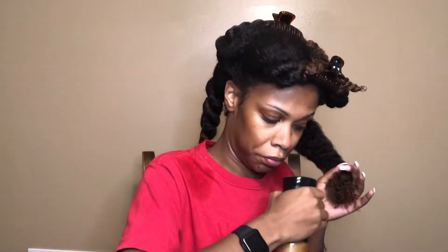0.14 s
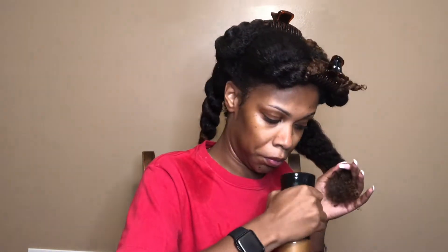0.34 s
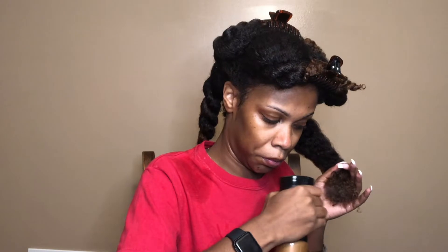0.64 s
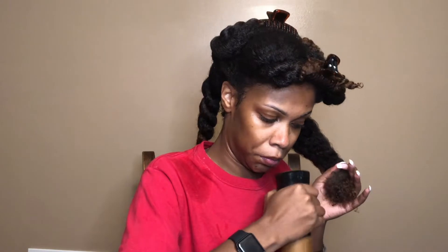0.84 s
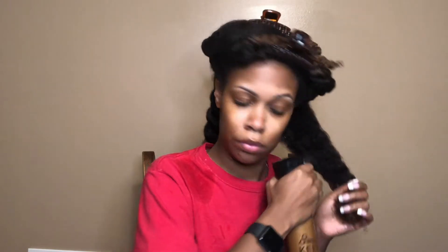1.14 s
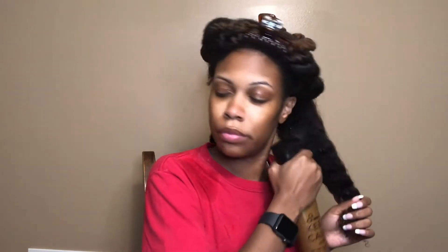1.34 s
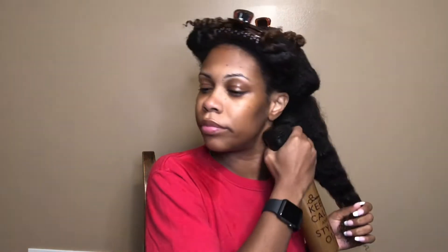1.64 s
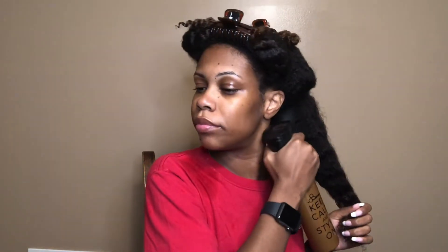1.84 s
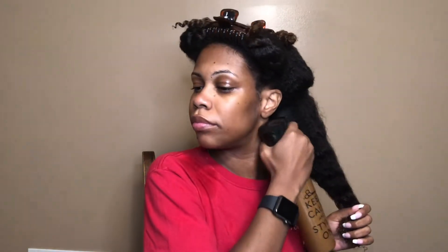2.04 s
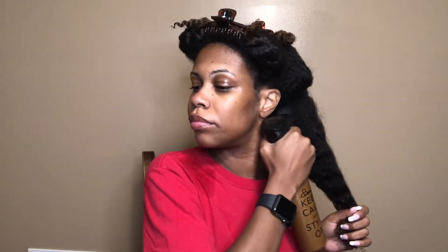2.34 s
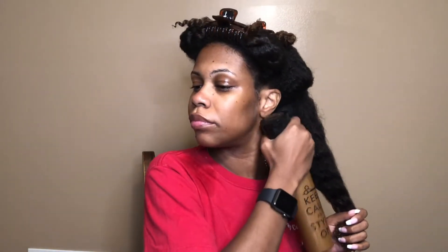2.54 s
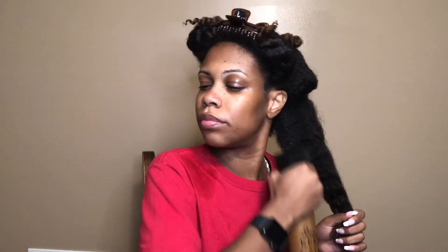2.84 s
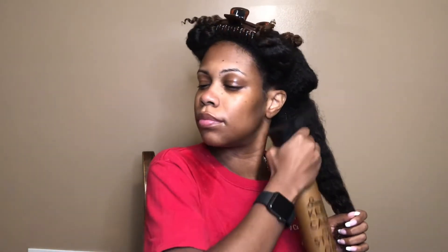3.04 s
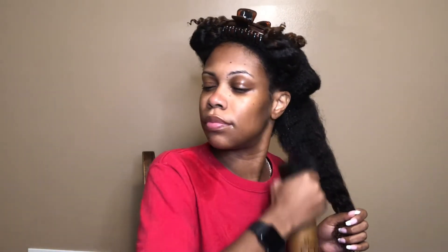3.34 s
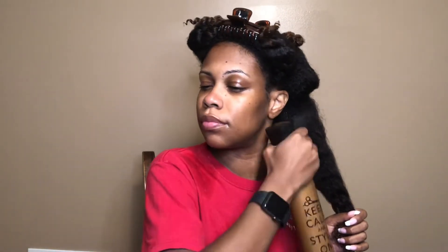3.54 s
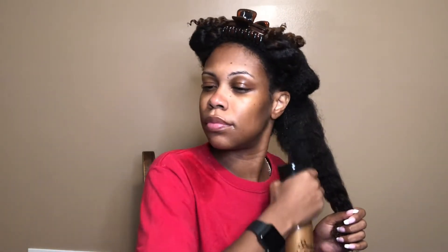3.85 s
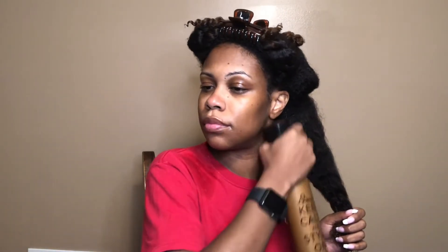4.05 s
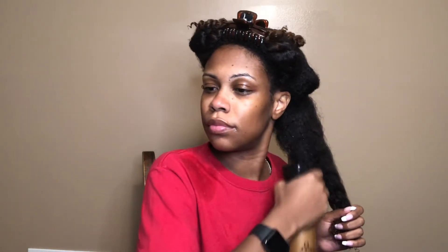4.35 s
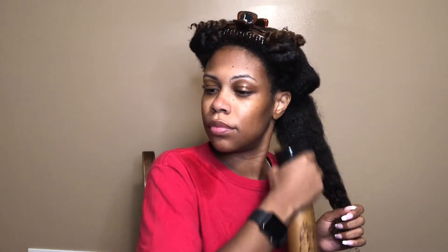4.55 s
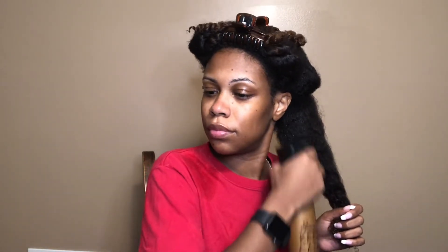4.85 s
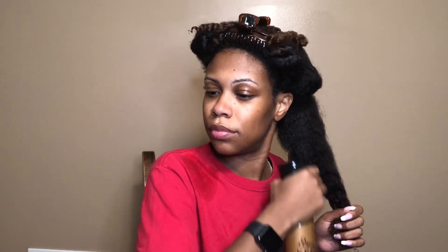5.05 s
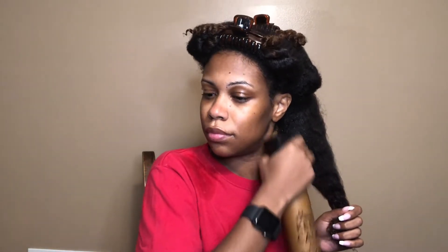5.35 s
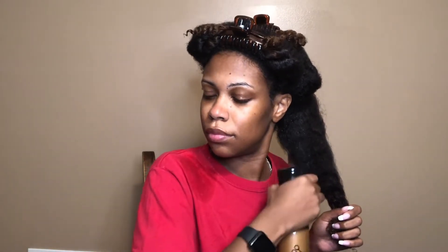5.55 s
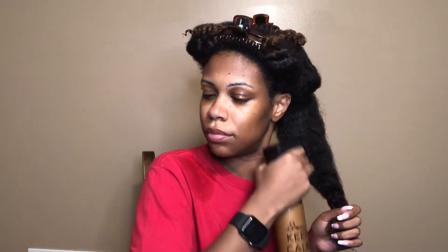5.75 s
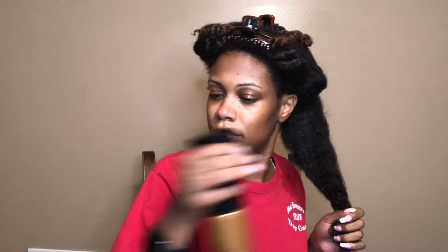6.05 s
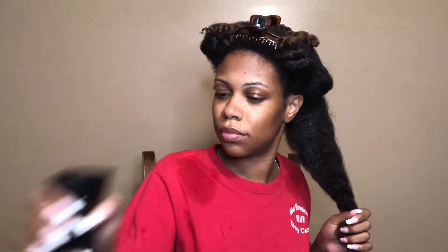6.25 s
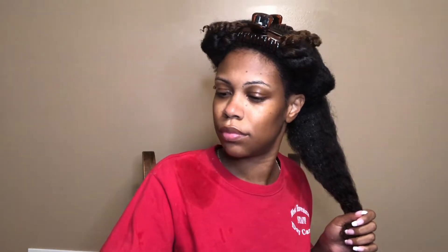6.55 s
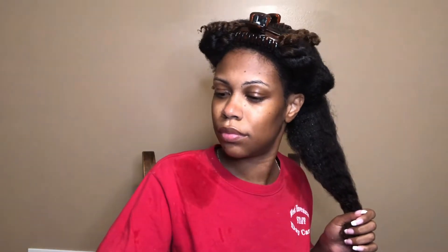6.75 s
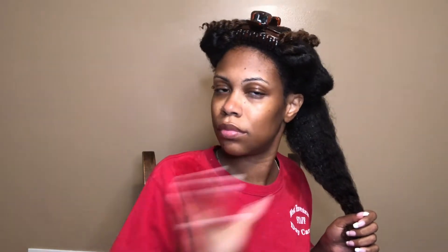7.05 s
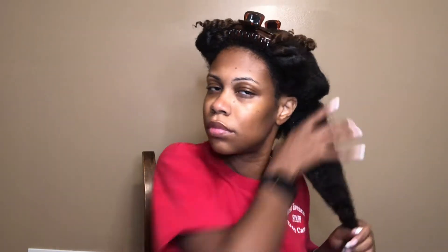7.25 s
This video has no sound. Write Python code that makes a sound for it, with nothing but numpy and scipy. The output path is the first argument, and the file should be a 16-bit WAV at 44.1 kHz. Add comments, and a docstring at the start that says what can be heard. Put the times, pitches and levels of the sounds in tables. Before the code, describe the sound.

A single microphone in a small, quiet indoor room, with soft air noise and, from about 1.3 seconds, a faint wavering low hum. From the start a bottle sprays fine water mist onto hair: a steady, bright, airy hiss, slightly fluttering and swishing as the hand moves. Small hollow water plops and faint gurgles sit beneath it, the clearest near 1.9 seconds, with a few soft dull hand bumps. Around 4.1 to 4.4 a faint breathy whistle glides upward; the hiss then pulses gently and weakens, cutting off quickly at about 5.6. Near-silence follows, with a tiny plastic tick at 6.2 and another at 6.5. At 6.56 the bottle lands on a wooden table with one sharp, loud, hollow knock and short woody ring. From 6.95 it wobbles, its rim giving a quick irregular run of softer, dull low taps and rolling rumble until the end, about 7.4.

```python
"""A continuous-mist bottle sprays water onto hair in one long hiss: shaped noise, combed by reflections and moved about.
A brief whistle of narrow noise rides on it; water plops and dull bumps are ringing sines, cap ticks ring plastic modes.
The mist dies away, the bottle knocks onto a wooden table and wobbles there, its taps and rolling exciting table modes.
Behind it lies a small quiet room: coloured noise for the air and a low, wavering hum. One microphone hears it all."""
import sys
import numpy as np
from scipy import signal
from scipy.fft import rfft, irfft, next_fast_len
from scipy.io import wavfile
from scipy.ndimage import map_coordinates

SR = 44100
rng = np.random.default_rng(int(sys.argv[2]) if len(sys.argv) > 2 else 0)


def unload_wav(signal):
    """Save mono or channel-first audio to the path in sys.argv[1] as 16-bit WAV at rate SR, clipped to [-1, 1]."""
    wavfile.write(
        sys.argv[1],
        SR,
        np.round(np.clip(np.atleast_2d(signal).T, -1, 1) * 32767).astype(np.int16),
    )


N = 325899

# The mist swells and fades as the nozzle turns, levels before trim:
# t/s, hiss level/dB, bright edge level/dB, fine spray level/dB
MIST_LEVELS = [(0.03, -48, -52.5, -54.5), (0.09, -49, -51, -54), (0.18, -49.5, -51.5, -55),
               (0.32, -47, -49, -51.5), (0.43, -48, -50.5, -53), (0.62, -48, -51, -52.5),
               (0.73, -49.5, -52, -54), (0.82, -46.5, -46.5, -51), (0.85, -47.5, -49, -51),
               (1.27, -50.5, -53.5, -56), (1.35, -48.5, -48.5, -51.5), (1.42, -48.5, -49.5, -54.5),
               (1.74, -46.5, -53, -53.5), (1.84, -45.5, -49, -51), (1.87, -47.5, -49.5, -52),
               (2.06, -47.5, -53, -54.5), (2.2, -47.5, -55, -55), (2.31, -47.5, -50, -51.5),
               (2.63, -48, -52.5, -52.5), (2.68, -48.5, -54, -57), (2.73, -51.5, -54, -55),
               (2.77, -50.5, -50, -53.5), (2.87, -48.5, -48.5, -52), (2.93, -50.5, -50.5, -53),
               (2.98, -48, -52.5, -51.5), (3.29, -51.5, -51.5, -55), (3.37, -48.5, -47.5, -52.5),
               (3.5, -48.5, -50.5, -53.5), (3.53, -48, -52, -50.5), (3.86, -51.5, -51.5, -55),
               (4.09, -50, -54, -54), (4.51, -52.5, -53.5, -56.5), (4.81, -51, -56, -55.5),
               (5.06, -55, -54.5, -57.5), (5.33, -51.5, -56.5, -56.5), (5.6, -55, -56, -57.5)]
# Low rush on the hair, before trim: t/s, level/dB
RUSH_LEVELS = [(0.03, -54.5), (0.06, -57), (0.68, -56.5), (0.85, -55.5), (1.27, -56.5), (1.3, -55.5),
               (1.91, -53), (2.18, -55), (2.62, -54), (2.9, -57.5), (3.01, -55.5), (3.19, -56),
               (3.55, -55.5), (3.95, -57.5), (4.14, -55.5), (4.39, -58.5), (4.78, -56.5), (5.03, -58),
               (5.35, -56.5), (5.6, -60)]
# Colour of the jet: f/Hz, relative density/(dB per Hz)
JET_COLOUR = [(150, -35), (450, -19.5), (600, -11), (745, -8), (930, -9.5), (1350, -5.5), (1600, -7),
              (1900, -5.5), (3000, -4), (3900, -2), (4600, -2), (5600, -4.5), (7900, -6), (8300, -11),
              (15800, -13)]
# The hollow of hand and hair round the nozzle favours one band, before the strokes act on it:
# t/s, centre f/Hz, level relative to the hiss/dB
FAVOURED_BAND = [(0, 3300, -18), (.55, 3050, -8), (1.0, 3400, -30), (1.2, 4400, -12), (1.45, 4450, -7),
                 (1.8, 4480, -3), (2.2, 4500, -7), (2.6, 4300, -24), (2.85, 4150, 1), (3.1, 3900, -18),
                 (3.4, 4200, -19), (3.9, 3800, -24), (4.17, 3620, -28), (4.4, 3850, -16), (4.8, 3550, -9),
                 (5.6, 3700, -26)]
# Detour of the hiss by way of the hand, before sway: t/s, delay/ms
HAND_DETOUR = [(0, 0.32), (.6, 0.27), (1.3, 0.45), (2.3, 0.41), (3.4, 0.47), (5.6, 0.5)]
# The jet briefly whistles past the fingers: t/s, f/Hz, level/dB
WHISTLE_GLIDE = [(4.03, 3180, -85), (4.1, 3280, -60), (4.18, 3370, -54.5), (4.26, 3780, -70),
                 (4.34, 3970, -64), (4.44, 3950, -85)]
# Water plopping in the bottle: t/s, peak level of the ring/dB, f/Hz
WATER_PLOPS = [(.16, -52, 747), (.658, -47.5, 745), (1.188, -49, 844), (1.892, -40.5, 865),
               (2.305, -51, 770), (2.669, -49, 740), (3.21, -50, 829), (3.315, -48, 740), (3.447, -47, 730)]
# Soft bumps of the hand on the bottle: t/s, peak level of the ring/dB, f/Hz
HAND_BUMPS = [(1.327, -51, 157), (1.669, -51.5, 163), (4.609, -49, 290), (4.66, -51.5, 305)]
# Light ticks of the cap as the bottle is handled: t/s, force level/dB, contact softness f/Hz
CAP_TICKS = [(6.2207, -38.5, 10000), (6.529, -35, 1790), (6.918, -41.5, 3000)]
# Modes of the plastic cap: f/Hz, level per unit force/dB, t60/s
CAP_MODES = [(960, -11, 0.0089), (2160, -16, 0.013), (3450, -12, .01), (4800, -5, 0.0039),
             (8600, -14, 0.0032)]
# The bottle lands on its base: t/s, force level/dB, contact softness f/Hz
BASE_KNOCK = [(6.5577, -4.5, 3900), (6.5702, -16, 2400)]
# It rocks from side to side, its rim tapping as it swings: t/s, force level/dB, contact softness f/Hz
RIM_TAPS = [(6.95, -11, 500), (6.964, -2.5, 1100), (7.055, -2, 1790), (7.124, -2.5, 750),
            (7.191, -7.5, 1300), (7.234, -13, 700), (7.26, -5, 700), (7.329, -5, 850), (7.376, -13, 900)]
# Modes of table and bottle: f/Hz, level under the base/dB, mean level under the rim/dB, t60/s
TABLE_MODES = [(67.3, -21.5, -50, 0.46), (129.7, -27, -42, 0.2), (179, -21, -64, 0.13),
               (219.3, -10, -43.5, 0.13), (265.5, -14.5, -51, 0.13), (305, -18, -51, 0.14),
               (320, -16, -42, 0.2), (445, -31, -56, 0.092), (441.3, -26, -45, 0.18),
               (510, -20.5, -56, 0.086), (534, -16.5, -60, 0.093), (603, -30, -59, 0.21),
               (690, -47, -52, .05), (742, -28, -83, 0.1), (800, -41, -64, 0.056), (860, -38, -58, 0.056),
               (987, -30, -51, 0.065), (1056, -37, -69, 0.055), (1360, -41, -80, 0.034),
               (1470, -43, -71, 0.034), (1610, -49, -95, 0.67), (1620, -30, -76, 0.064),
               (1910, -39, -82, 0.13), (2650, -36, -82, 0.025), (2900, -40, -82, 0.05),
               (4470, -35, -85, .012)]
# Colour of the quiet room air: f/Hz, relative density/(dB per Hz)
AIR_COLOUR = [(20, -2.5), (50, -2.5), (100, 0.5), (170, -1.5), (300, -4.5), (500, -7.5), (1000, -14.5),
              (1700, -19.5), (3000, -20), (3900, -22), (7900, -23), (8300, -27), (15800, -29.5)]
# The room's ring: f/Hz, t60/s
ROOM_DECAY = [(60, 0.84), (250, 0.51), (600, 0.72), (1800, 0.59), (4000, 0.28), (12000, 0.065)]

VALVE_SHUTS_S, RUN_OUT_DB_PER_S = 5.628, 280
# strokes along the hair; at the top of each the favoured band is stronger and lower
STROKES_START_S, STROKE_TOP_S, STROKE_PERIOD_S = 4.0, 4.17, .595
STROKE_FOCUS_DB, STROKE_DIP_HZ = 5, 250
NECK_DETOUR_RATIO = 2.015  # the way round by the neck is this much longer
# the faintest plops come thick and fast while the water is drawn up
GURGLES_PER_S, GURGLE_DB, GURGLE_HZ = 45, -61, (727, 748, 825)
# every tap of the rim is followed by a softer rebound
REBOUND_S, REBOUND_LOSS_DB, REBOUND_SOFT_HZ = 0.01732, 2.5, 580
ROLL_STARTS_S = 6.95
BENDING_HZ = 503  # bending waves in the board: the lows arrive a little after the highs
AIR_DB = -63.5
HUM_HZ, HUM_DB, HUM_STARTS_S = 52.2, -66.5, 1.32
PEAK_CEILING, CUTOFF_HZ = 0.23, 15800


def mist(hiss_trim_db=-0.58, bright_trim_db=-0.6, rush_trim_db=-1.5, fine_trim_db=0.3, flutter_db=0.43):
    """Turbulence at the nozzle: a hiss with a bright edge, a lower rush on the hair, the sizzle of the finest drops."""
    t = np.arange(N) / SR
    hiss_db, bright_db, fine_db = in_time(MIST_LEVELS)
    rush_db, = in_time(RUSH_LEVELS)

    rush = filtered(noise(JET_COLOUR), 2500, "low", order=8)
    rush = rush / np.std(filtered(rush, 900, "high", order=6))  # level counted above 900 Hz
    hiss = favoured(rms_one(filtered(noise(JET_COLOUR), [2500, 5200], "band", order=5)))
    bright = rms_one(filtered(noise(JET_COLOUR), [5200, 8200], "band", order=5))
    fine = filtered(noise(JET_COLOUR), 8200, "high", order=10)
    fine = fine / np.std(filtered(fine, CUTOFF_HZ, "low", order=8))  # level counted below the cutoff

    spray = from_db(rush_db + rush_trim_db) * rush
    spray = spray + from_db(hiss_db + hiss_trim_db) * hiss
    spray = spray + from_db(bright_db + bright_trim_db) * bright
    spray = spray + from_db(fine_db + fine_trim_db) * fine
    # the flow flutters a little, and runs out once the valve shuts
    run_out_db = RUN_OUT_DB_PER_S * np.maximum(t - VALVE_SHUTS_S, 0)
    return from_db(flutter_db * drift(70) - run_out_db) * spray


def favoured(hiss, width_hz=380):
    """The hollow round the nozzle adds a band of noise to the hiss, sliding as the bottle moves."""
    t = np.arange(N) / SR
    centre_hz, strength_db = in_time(FAVOURED_BAND)
    height = np.cos(2 * np.pi * (t - STROKE_TOP_S) / STROKE_PERIOD_S) * (t > STROKES_START_S)
    band = noise_band(centre_hz - STROKE_DIP_HZ * height, width_hz)
    share = from_db(strength_db + STROKE_FOCUS_DB * height)
    return (hiss + share * band) / np.sqrt(1 + share ** 2)


def patchy(x, depth_db=1.08, patch_width_hz=260, patch_s=.09, size=512):
    """Narrow bands of a hiss swell and fade by chance."""
    hz, s, cells = signal.stft(x, SR, nperseg=size)
    place = np.meshgrid(hz / patch_width_hz, s / patch_s, indexing="ij")
    chance = rng.standard_normal((200, 200))
    swell_db = depth_db * map_coordinates(chance, place, order=3, mode="mirror")
    return signal.istft(cells * rms_one(from_db(swell_db)), SR, nperseg=size)[1][:N]


def glanced(x, hand_db=-19, neck_db=-21, sway_ms=0.048):
    """Reflections off hand and neck comb the hiss; their paths change as the arm moves, so it swishes."""
    n, out = np.arange(N), x
    gains = from_db([hand_db, neck_db])
    hand_ms, = in_time(HAND_DETOUR)
    for delay_ms, gain in zip([hand_ms, NECK_DETOUR_RATIO * hand_ms], gains):
        lag = (delay_ms + sway_ms * drift(5)) * SR / 1000  # in samples
        out = out + gain * map_coordinates(x, [n - lag], order=3)
    return out / np.sqrt(1 + np.sum(gains ** 2))


def whistle(width_hz=110):
    """The jet past the fingers: a narrow band of noise that glides upwards, then eases down at the end."""
    hz, db = in_time(WHISTLE_GLIDE)
    return from_db(db) * noise_band(hz, width_hz)


def handling(room_db=-16):
    """Plops, bumps and ticks of the bottle in the hand, with a little of the room."""
    direct = plops() + gurgles() + bumps() + ticks()
    return direct + from_db(room_db) * room(direct)


def plops(t60=0.08, splash_db=7):
    """Water plops: each a decaying sine with a little splash of noise."""
    total = 0
    for s, db, hz in WATER_PLOPS:
        splash = crack(s, db + splash_db, t60=.09, low_hz=700, high_hz=850)
        total = total + ring(click(s, db), hz, t60) + splash
    return total


def gurgles(t60=0.074, spread_db=2):
    """Faint chance plops for as long as the bottle sprays, each a decaying sine."""
    spraying = np.arange(N) / SR < VALVE_SHUTS_S
    chance = GURGLES_PER_S / len(GURGLE_HZ) / SR  # per sample and pitch
    total = 0
    for hz in GURGLE_HZ:
        drops = (rng.random(N) < chance) * spraying
        total = total + ring(drops * from_db(GURGLE_DB + spread_db * drift(26)), hz, t60)
    return total


def bumps(t60=0.089):
    """Dull bumps of the hand: the bottle rings as a short low sine."""
    return sum(ring(click(s, db), hz, t60) for s, db, hz in HAND_BUMPS)


def ticks():
    """Light touches set the modes of the plastic cap ringing, with alternating sign."""
    touches = contacts(CAP_TICKS)
    return sum((-1) ** k * ring(from_db(db) * touches, hz, t60) for k, (hz, db, t60) in enumerate(CAP_MODES))


def table(room_db=-13, room_low_hz=260, board_low_hz=50):
    """The base lands on the wood, then the rim rolls and taps; the board spreads the sound in time."""
    wood = filtered(dispersed(table_modes()), board_low_hz, "high", order=4)
    direct = wood + knock_noise() + filtered(tap_noise(), 1700, "low")
    # a board radiates its lowest modes poorly into the room
    return direct + from_db(room_db) * room(filtered(direct, room_low_hz, "high", order=1))


def table_modes(rolling_db=-47, rim_spread_db=4):
    """Base and rim shake the same modes; the balance under the rim shifts from spot to spot."""
    blow = contacts(BASE_KNOCK)
    rolling = np.arange(N) / SR > ROLL_STARTS_S
    rumble = rolling * filtered(rng.standard_normal(N), 410, "low")
    rim = contacts(wobble()) + from_db(rolling_db) * rumble
    total = 0
    for hz, base_db, rim_db, t60 in TABLE_MODES:
        rim_gain = from_db(rim_db + rim_spread_db * drift(14))
        total = total + ring(from_db(base_db) * blow + rim_gain * rim, hz, t60)
    return total


def wobble():
    """Touches of the rim, each tap with its rebound: t/s, force level/dB, contact softness f/Hz."""
    rebounds = [(s + REBOUND_S, db - REBOUND_LOSS_DB, REBOUND_SOFT_HZ) for s, db, _ in RIM_TAPS]
    return list(RIM_TAPS) + rebounds


def knock_noise():
    """Many weaker, crowded modes of the knock blur into a snap, a thud and a short woody rattle."""
    s = BASE_KNOCK[0][0]
    snap = crack(s, db=-30.0, t60=0.069, low_hz=700, high_hz=2620)
    thud = crack(s, db=-12.5, t60=0.12, low_hz=304, high_hz=740)
    rattle = crack(s, db=-15.5, t60=0.55, low_hz=100, high_hz=475)
    return snap + filtered(thud + rattle, 1900, "low", order=4)


def tap_noise(tap_db=-32):
    """Crowded modes blur under each rim tap too, swelling softly."""
    return sum(crack(s, db + tap_db, t60=0.22, low_hz=120, high_hz=soft_hz / 3, attack_s=0.0091)
               for s, db, soft_hz in wobble())


def dispersed(x, order=5):
    """Allpasses hold the lows back, as a board does."""
    a = -np.exp(-2 * np.pi * BENDING_HZ / SR)
    return signal.sosfilt([[a, 1, 0, 1, a, 0]] * order, x + 1e-18)


def room(x, first_echo_s=0.0037):
    """Diffuse reflections of unit energy that die at their own rate in each band, fastest in the top treble."""
    t, tail = np.arange(SR) / SR, 0
    edges = np.geomspace(40, 16000, 10)
    for low, high in zip(edges, edges[1:]):
        band = filtered(rng.standard_normal(SR), [low, high], "band")
        t60 = at_hz(ROOM_DECAY, np.sqrt(low * high))
        tail = tail + band * np.exp(-np.log(1000) * t / t60)
    tail = tail * np.clip(t / first_echo_s - 1, 0, 1)  # silent up to the first echo, then fading in
    return signal.fftconvolve(x, tail / np.sqrt(np.sum(tail ** 2)))[:N]


def moving_room(x, count=10):
    """The reflections keep changing while their source moves: crossfades between different rooms' tails."""
    place = np.linspace(0, count, N)
    return sum(room(x * np.sqrt(np.clip(1 - np.abs(place - k), 0, 1))) for k in range(count + 1))


def background(waver_db=0.5):
    """Room air as coloured noise, and a low wavering sine hum that sets in during the spraying."""
    t = np.arange(N) / SR
    running = np.clip((t - HUM_STARTS_S) / .1, 0, 1)
    hum = np.sqrt(2) * np.sin(2 * np.pi * HUM_HZ * t + .3 * drift(3.8))
    hum_gain = from_db(HUM_DB + waver_db * drift(3.7))
    return from_db(AIR_DB) * noise(AIR_COLOUR) + hum_gain * running * hum


def from_db(db):
    """Decibels to gain."""
    return 10 ** (np.asarray(db) / 20)


def rms_one(x):
    """Scale to unit rms."""
    return x / np.sqrt(np.mean(x ** 2) + 1e-20)


def in_time(rows):
    """Each column of a curve, sample by sample."""
    s, *columns = np.transpose(rows)
    return [np.interp(np.arange(N) / SR, s, c) for c in columns]


def at_hz(points, hz):
    """Read a table on a log-frequency axis."""
    f, value = np.transpose(points)
    return np.interp(np.log(np.maximum(hz, 1)), np.log(f), value)


def filtered(x, hz, kind, order=2):
    """Causal Butterworth filter."""
    sections = signal.butter(order, np.clip(hz, 10, .45 * SR), kind, fs=SR, output="sos")
    return signal.sosfilt(sections, x + 1e-18)


def noise(spectrum):
    """Noise of a given colour, rms 1."""
    size = next_fast_len(N)
    hz = np.arange(size // 2 + 1) * SR / size
    white = rfft(rng.standard_normal(size))
    return rms_one(irfft(white * from_db(at_hz(spectrum, hz)), size)[:N])


def noise_band(centre_hz, width_hz):
    """Low noise shifted up onto a gliding carrier, rms 1."""
    carrier = np.cos(2 * np.pi * np.cumsum(centre_hz) / SR)
    return rms_one(filtered(rng.standard_normal(N), width_hz, "low") * carrier)


def drift(rate):
    """Slow chance with a spread near 1: straight lines between random points, rate points per second."""
    return np.interp(np.arange(N) / SR * rate, np.arange(4000), rng.standard_normal(4000))


def click(s, db):
    """One impulse."""
    return from_db(db) * (np.arange(N) == round(s * SR))


def contacts(rows):
    """Force of a row of touches; a soft touch lacks the highs."""
    return sum(filtered(click(s, db), soft_hz, "low") for s, db, soft_hz in rows)


def ring(force, hz, t60):
    """A resonator: a unit click sets a decaying sine of height 1 ringing."""
    r, w = from_db(-60 / (t60 * SR)), 2 * np.pi * hz / SR
    return signal.lfilter([0, np.sin(w)], [1, -2 * r * np.cos(w), r * r], force + 1e-18)


def crack(s, db, t60, low_hz, high_hz, attack_s=0):
    """Brief noise of a contact, level set before filtering; a soft meeting takes a moment to swell."""
    age = np.arange(N) / SR - s
    swell = np.clip(age / (attack_s + 1 / SR), 0, 1)
    decay = np.exp(-np.log(1000) * np.clip(age / t60, 0, 10))
    burst = rng.standard_normal(N) * swell * decay
    return from_db(db) * filtered(filtered(burst, high_hz, "low"), low_hz, "high")


def scene(mist_room_db=-10):
    """One microphone: both channels carry the same sound."""
    spray = glanced(patchy(mist())) + whistle()
    spray = spray + from_db(mist_room_db) * moving_room(spray)
    return np.tile(spray + handling() + table() + background(), (2, 1))


def record(dry):
    """The loudest peaks are rounded off, and the top is cut steeply."""
    rounded = dry / (1 + (dry / PEAK_CEILING) ** 4) ** .25
    return signal.sosfilt(signal.ellip(12, .1, 80, CUTOFF_HZ, fs=SR, output="sos"), rounded)


dry = scene()
out = record(dry)
unload_wav(out)
```